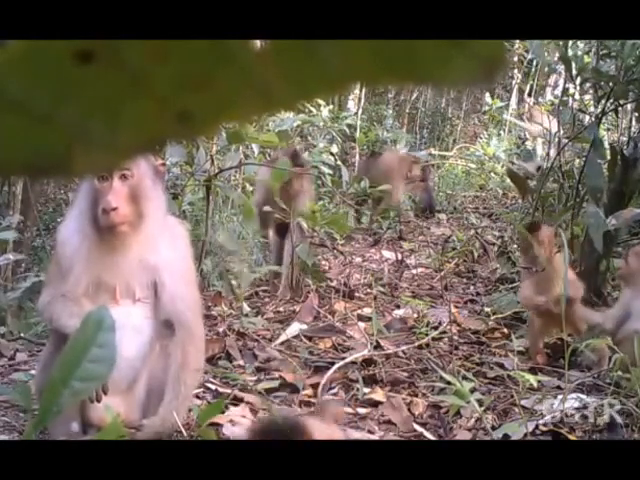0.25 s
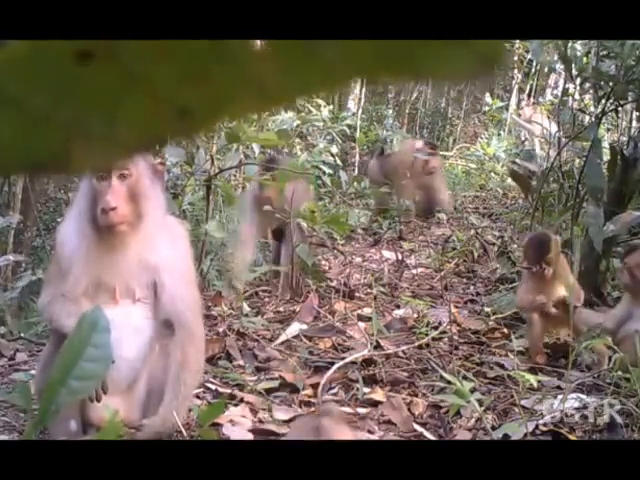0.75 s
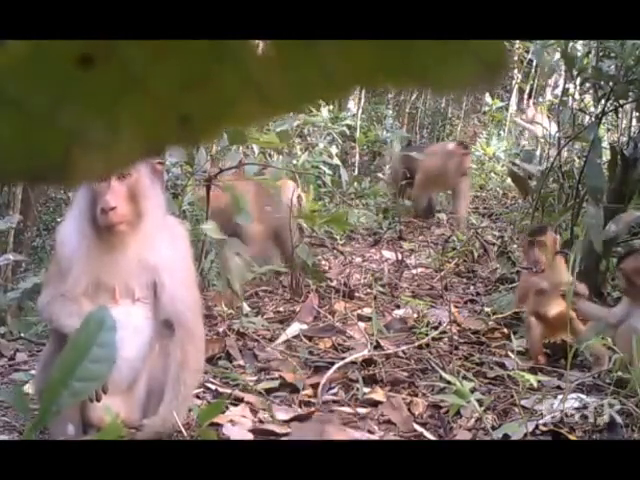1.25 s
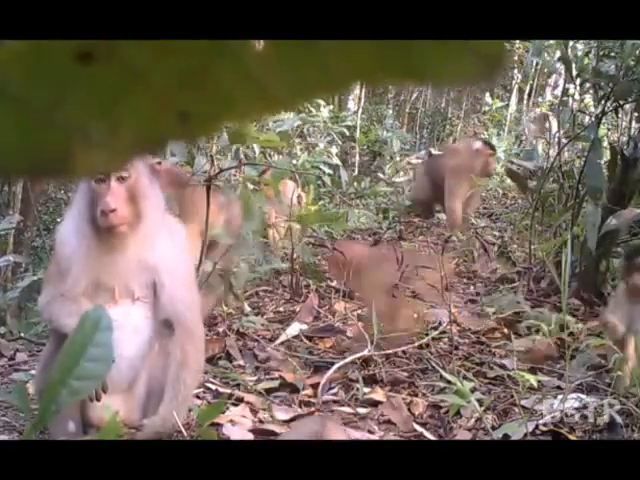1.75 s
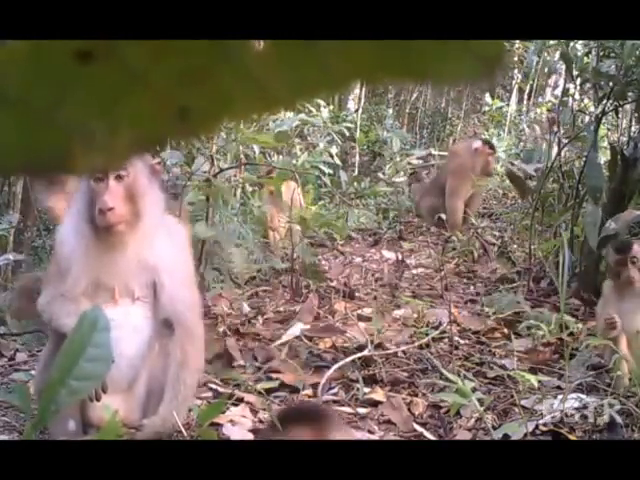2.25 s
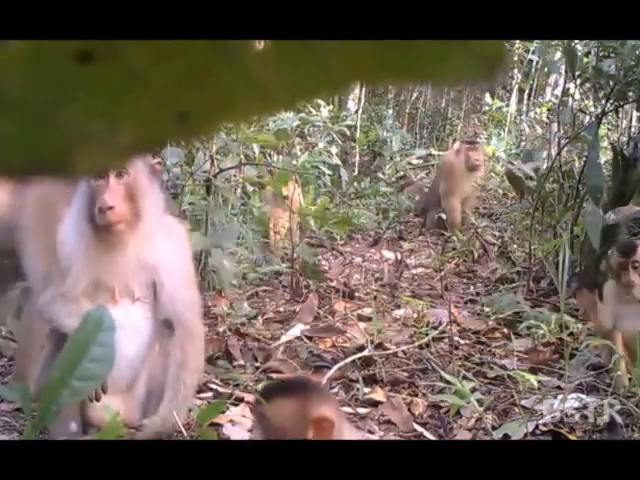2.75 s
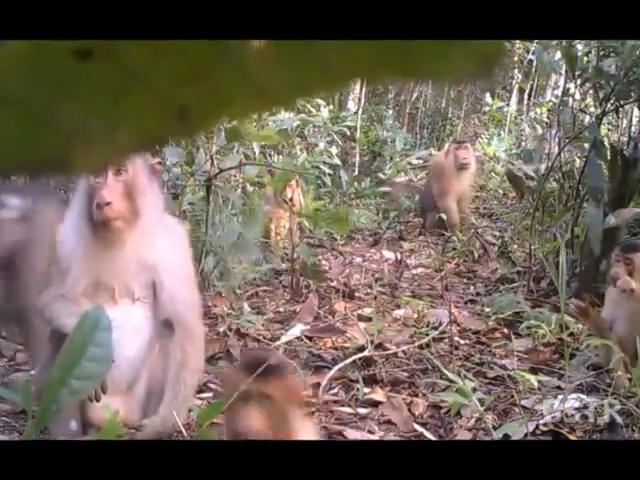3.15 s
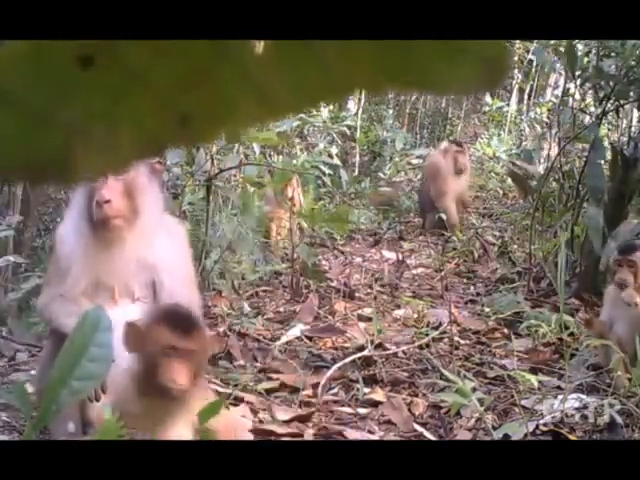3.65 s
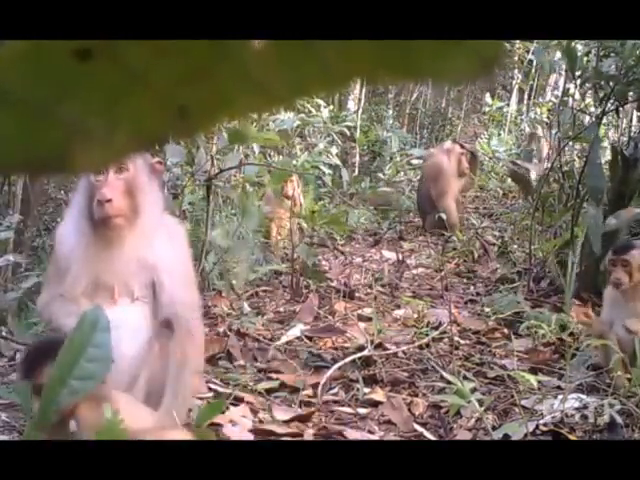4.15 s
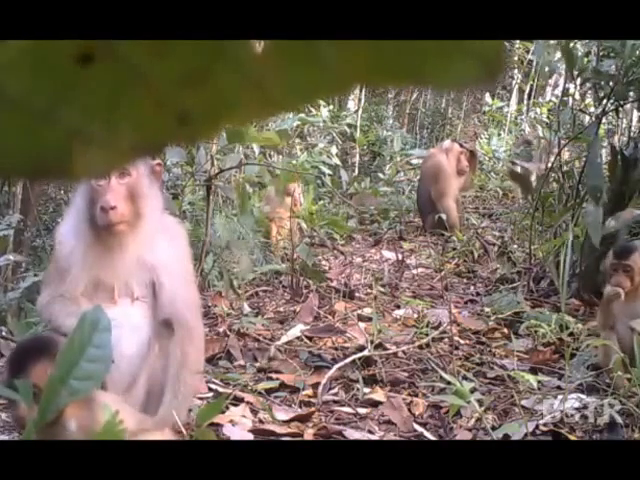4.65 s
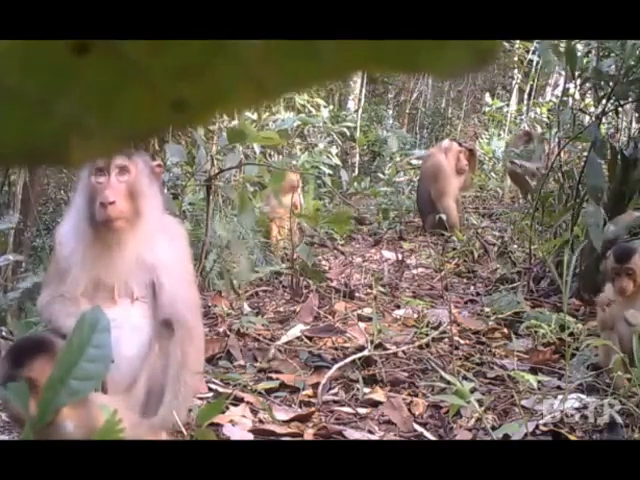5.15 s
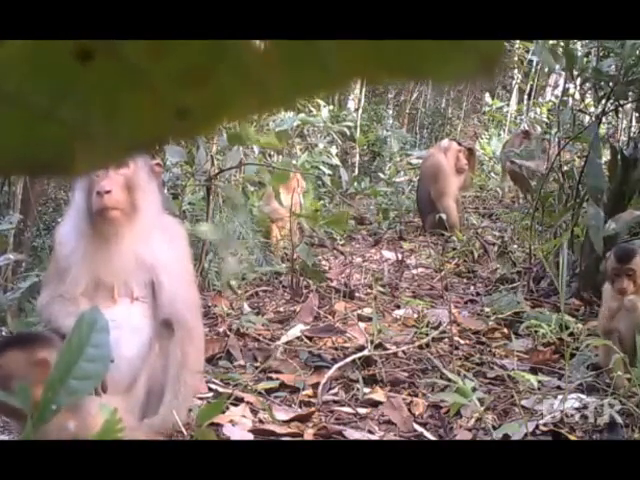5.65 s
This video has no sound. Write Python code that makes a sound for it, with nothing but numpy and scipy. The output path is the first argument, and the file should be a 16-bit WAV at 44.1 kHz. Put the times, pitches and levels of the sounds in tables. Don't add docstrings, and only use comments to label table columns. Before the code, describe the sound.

On a tropical forest floor, a distant bird gives a quick falling whistle about three times a second, echoing off trunks. Insects and air hiss steadily under low wind rumble. Monkeys close to a small boxed microphone stir dry leaves throughout, with a crackling burst and snap near two seconds, more scuffs around three, a sharp twig break at four, and crisp leaf cracks at the end.

```python
import sys
import numpy as np
from scipy import signal
from scipy.fft import rfft, irfft
from scipy.io import wavfile
from scipy.ndimage import uniform_filter1d

SR = 44100
rng = np.random.default_rng(int(sys.argv[2]) if len(sys.argv) > 2 else 0)


def unload_audio(sound):
    columns = np.transpose(np.atleast_2d(sound))
    steps = np.round(np.clip(columns, -1, 1) * 32767)
    wavfile.write(sys.argv[1], SR, steps.astype(np.int16))


def volts_from_decibels(level):
    exponent = np.asarray(level, float) / 20
    return 10 ** exponent


N = 261072


def unit(x):
    return x / np.sqrt(np.mean(x ** 2))


def colour(x, spectrum):
    hz, db = np.transpose(spectrum)
    bins = np.arange(len(x) // 2 + 1) * SR / len(x) + 1e-3
    gain = volts_from_decibels(np.interp(np.log(bins), np.log(hz), db))
    return irfft(rfft(x) * gain, len(x))


def band(x, lo_hz, hi_hz):
    edges = [lo_hz, min(hi_hz, .45 * SR)]
    return signal.sosfilt(signal.butter(2, edges, "band", fs=SR, output="sos"), x)


def curves(table):
    s, *columns = np.transpose(table)
    return [np.interp(np.arange(N) / SR, s, c) for c in columns]


def walk(rate):
    hold = int(SR / rate)
    steps = np.repeat(rng.standard_normal(N // hold + 1), hold)
    return 0.96 * uniform_filter1d(uniform_filter1d(steps, hold), hold)[:N]


def cracks(per_s, spread_db, smear_s, size=N):
    strength_db = spread_db * np.minimum(rng.exponential(size=size), 4.5)
    hits = (rng.random(size) < per_s / SR) * volts_from_decibels(strength_db)
    glow = signal.lfilter([1], [1, -np.exp(-1 / (smear_s * SR))], hits ** 2)
    return unit(np.sqrt(glow + 1e-9) * rng.standard_normal(size))


def add(track, sound, s):
    i = int(s * SR)
    part = sound[max(-i, 0):N - i]
    track[max(i, 0):max(i, 0) + len(part)] += part


def bird():
    # time from its start in seconds, pitch in Hz, level in dB.
    whistle = [
        (.0045, 2660, -26),
        (.006, 2530, -6),
        (.009, 2365, -.5),
        (.0155, 2145, 1.5),
        (.022, 1925, -7),
        (.044, 1360, -14.5),
        (.054, 1303, -12),
        (.08, 1300, -12),
        (.09, 1298, -30),
    ]
    # start in seconds, level in dB, extra strength of the low end in dB.
    song = [(-.012, -29.5, -1), (.4095, -32, 3), (.926, -28, -3), (1.2798, -28, -6), (1.606, -27.5, 0),
            (1.958, -28.5, -4), (2.296, -27.5, 0.5), (2.64, -29, 1), (2.98, -29, 2), (3.3185, -29.5, 3),
            (3.651, -28.5, 0), (4.026, -29, -1), (4.38, -28.5, 1.5), (4.721, -29, -0.5), (5.071, -28, -2),
            (5.552, -28, -0.5), (5.897, -29.5, 0)]
    # delay in seconds, level in dB.
    echoes = [
        (.0028, -11),
        (.0072, -7),
        (.0125, -9.5),
        (.016, -12),
        (.029, -15),
        (.0376, -14),
        (.058, -13),
        (.078, -18),
    ]
    # pitch in Hz, level in dB.
    echo_colour = [
        (1300, -3),
        (1800, 2),
        (2150, -3),
        (2420, 3.5),
        (2700, 6),
    ]
    wood_t60_s, wood_db = .65, -2
    s, hz, db = np.transpose(whistle)
    t = np.arange(int(s[-1] * SR)) / SR
    glide_hz, shape_db = np.interp(t, s, hz), np.interp(t, s, db)
    lag = np.arange(SR // 2) / SR
    fade = volts_from_decibels(-60 * lag / wood_t60_s) * (1 - np.exp(-lag / .006))
    fade *= volts_from_decibels(wood_db) / np.sqrt(np.sum(fade ** 2))
    trunks = rng.standard_normal(len(lag))
    out = np.zeros(N)
    for start, call_db, low_db in song:
        pitch_factor = 1 + .004 * rng.standard_normal()
        wood = fade * (.75 * trunks + .65 * rng.standard_normal(len(lag)))
        for delay, echo_db in echoes:
            wood[int(delay * SR)] += volts_from_decibels(echo_db + 2.0 * rng.standard_normal())
        wood = colour(wood, echo_colour)
        wood[0] += 1
        tone = np.sin(2 * np.pi * pitch_factor * np.cumsum(glide_hz) / SR)
        low_end_db = low_db * np.clip(t / 0.029 - .5, 0, 1)
        call = tone * volts_from_decibels(call_db + shape_db + low_end_db)
        add(out, signal.fftconvolve(call, wood), start)
    return out


def hiss():
    # pitch in Hz, level in dB per Hz.
    hiss_colour = [(35, -4), (60, 2.5), (183, -7), (455, -11.5), (630, -14.5), (1420, -14), (1920, -17.5),
                   (2370, -14.5), (3960, -14.5), (5610, -13), (13000, -23), (14600, -25), (15600, -34)]
    level_db = -37.5 + .5 * walk(3.39)
    return volts_from_decibels(level_db) * unit(colour(rng.standard_normal(N), hiss_colour))


def wind():
    # time in seconds, level in dB.
    gusts = [(0, -26), (.08, -16), (.17, -20), (.3, -15), (.43, -28.5), (.54, -23), (1.08, -25),
             (1.2, -16.5), (1.75, -22), (2.3, -25), (3.59, -24), (3.87, -29), (4.04, -22), (4.8, -27.5),
             (4.92, -16), (5.29, -28.5), (5.43, -16), (5.7, -22)]
    # pitch in Hz, level in dB per Hz.
    rumble_colour = [
        (1.2, -25),
        (2, 1.5),
        (18, 8.5),
        (25, -8.5),
        (38, -11.5),
        (52, -13.5),
        (75, -24),
        (120, -26),
        (200, -76),
    ]
    return volts_from_decibels(curves(gusts)[0] - 4.5) * unit(colour(rng.standard_normal(N), rumble_colour))


def movement():
    # time in seconds, level in dB, extra from big leaves in dB.
    stirring = [(0, -32.5, 0), (.3, -32, 4), (.66, -39, 2), (1.1, -42, 0.5), (1.34, -39, 0.5),
                (1.46, -47, 1), (1.52, -37, -1), (1.78, -39, -1.5), (1.89, -48, 0.5), (2.15, -39, -0.5),
                (2.55, -43.5, 0), (2.73, -37.5, 1), (2.9, -42.5, -2.5), (3.6, -47, 2), (4.2, -38, 1),
                (4.6, -38.5, -1), (5.1, -37.5, 1.5), (5.92, -55, -5)]
    # loudest moment in seconds, level in dB,
    # length in seconds, extra from fine leaves in dB.
    pushes = [(0.127, -36, 0.13, -18), (0.415, -35.5, 0.13, 8), (1.21, -33.5, 0.094, -18),
              (1.823, -30, 0.067, -2), (1.988, -28, 0.098, -6), (2.069, -31, 0.12, -3),
              (2.166, -28.5, 0.018, -9), (2.237, -40, 0.023, 13), (2.465, -34.5, 0.05, -5),
              (2.774, -27.5, 0.021, -22), (2.82, -37.5, 0.034, 26), (2.999, -29.5, 0.037, -10),
              (3.134, -28.5, 0.07, -1), (3.3, -40, 0.062, 3), (3.81, -43, 0.027, 6), (3.96, -25, .015, -19),
              (3.988, -28, 0.088, 3), (4.09, -30, .05, -13), (4.352, -27, 0.027, -8),
              (4.417, -34, 0.24, -13), (4.62, -31, 0.019, -15), (4.662, -34.5, 0.034, 32),
              (4.74, -37, 0.035, 9), (4.934, -33.5, 0.17, -11), (5.12, -36, 0.049, 1),
              (5.503, -31.5, 0.16, -9), (5.738, -36, 0.041, 13), (5.76, -38, 0.02, 13),
              (5.79, -34, 0.027, 12), (5.839, -33, 0.0075, 0)]
    stir_fine_db = -2
    rise_share, fade_db = 0.76, 17.5
    heavy_db, heavy_follow = -3.5, 0.41
    t = np.arange(N) / SR
    stir_db, big_db = curves(stirring)
    power = volts_from_decibels(2 * stir_db)
    fine = power * stir_fine_db
    for s, db, length, fine_db in pushes:
        away = np.maximum(t - s, (s - t) / rise_share) / max(length, .004)
        push = volts_from_decibels(2 * (db - fade_db * away ** 1.5))
        power = power + push
        fine = fine + push * fine_db
    level_db = 10 * np.log10(power)
    big_leaves_db = big_db + heavy_db - heavy_follow * (level_db + 35)
    return level_db, big_leaves_db, fine / power


def shuffle():
    # pitch in Hz, level in dB per Hz.
    litter_colour = [(120, 0), (200, -12), (304, -5), (471, -3), (516, -4.5), (1260, -1.5), (2260, -1),
                     (6050, 0), (11700, -5), (14500, -16), (15600, -26)]
    level_db, heavy_db, fine_db = movement()
    shared = cracks(900, 3.2, .0008)
    scuff_db = 1.1 * walk(25) + 1.3 * walk(70)
    out = np.zeros(N)
    for hz in 250 * 2 ** np.arange(0, 6.1, .5):
        octaves = np.log2(hz / 4500)
        low_lean = np.clip(-octaves / 1.33, 0, 1) * (heavy_db + 8)
        high_lean = np.clip(octaves / 3.1, 0, 1) * (fine_db + 0.5)
        crisp = np.clip(1 + octaves / 5, .1, 1)
        grains = 0.52 * crisp * shared + 0.91 * cracks(1200, 3.9 * crisp, 0.0036 / crisp)
        lean_db = low_lean + high_lean + 1.6 * walk(14)
        out += volts_from_decibels(lean_db) * band(grains, hz / 1.197, hz * 1.228)
    out = colour(out, litter_colour)
    return out / np.std(band(out, 2950, 8250)) * volts_from_decibels(level_db + scuff_db - 3.5)


def crushes():
    # start in seconds, length in seconds, level in dB, pitch of the hollow in Hz.
    squeezes = [(0, 0.65, -41.5, 4470), (1.96, 0.048, -30.5, 1610), (2.9, 0.13, -43, 2880),
                (1.982, .02, -29, 9500), (3.65, 0.046, -40, 3050), (4.336, 0.036, -30.5, 2700),
                (4.345, 0.05, -29.5, 5270), (5.715, .032, -33, 5300), (5.73, .016, -34.5, 9500),
                (5.762, 0.044, -34, 5650), (5.785, .016, -34, 8500)]
    width = 1 + 0.18
    out = np.zeros(N)
    grains = cracks(700, 3.2, .0012, size=2 * SR)
    for k, (s, length, db, hz) in enumerate(squeezes):
        t = np.arange(int(length * SR))
        fractures = grains[k * SR // 10:][:len(t)]
        ring = band(fractures, hz / width, hz * width)
        add(out, volts_from_decibels(db) * unit(ring) * np.sqrt(np.sin(np.pi * t / len(t))), s)
    return out


def leaves():
    # time in seconds, peak in dB, pitch in Hz.
    single = [(2.7704, -18, 3100), (3.2505, -21, 6930), (.3611, -16, 5680), (.438, -18, 5510),
              (.4496, -19, 5990), (4.0313, -20, 7100), (2.0658, -15, 7880), (1.3011, -17.5, 4870),
              (1.4686, -22, 8610), (1.5876, -20.5, 7500), (1.8204, -17, 5860), (2.003, -18, 11110),
              (2.476, -21, 3000), (2.2227, -23, 6030), (2.3395, -19.5, 6500), (2.4162, -19.5, 3790),
              (2.84, -22, 5210), (3.022, -15, 5600), (3.0678, -23, 4660), (3.1222, -17, 8740),
              (3.661, -25, 3140), (3.8643, -22, 8910), (4.0175, -20, 5700), (4.227, -19.5, 10250),
              (4.377, -23, 5470), (4.6231, -23, 5610), (4.8982, -18, 3360), (5.1138, -26, 5900),
              (5.3135, -20, 7800), (5.7378, -20, 9300)]
    count, middle_hz = 120, 5400
    over_db, spread_db = 11.5, 1
    dull_db, bright_db, bright_db_per_octave = -13, -10, 6
    chance = rng.standard_normal((count, 2))
    times = rng.random(count) * (N - 1) / SR
    level_db = movement()[0][(times * SR).astype(int)]
    peak_db = np.minimum(level_db, -30) + over_db + spread_db * chance[:, 0]
    stray = np.c_[times, peak_db, middle_hz * 2 ** (.4 * chance[:, 1])]
    rows = np.r_[single, stray]
    edge_db = rng.standard_normal((len(rows), 2)) * 3
    bright = bright_db + bright_db_per_octave * np.log2(rows[:, 2] / middle_hz) + edge_db[:, 1]
    return np.c_[rows, dull_db + edge_db[:, 0], bright].tolist()


def snaps():
    # time in seconds, peak in dB, pitch in Hz, dull part in dB, bright part in dB.
    loud_snaps = [(0.2135, -19, 3660, -5, -10), (1.5034, -16, 5680, -21, -14), (1.826, -16, 7900, -16, -14),
                  (1.969, -17, 3250, -6, -13), (1.976, -13, 8610, -17, -13), (1.9833, -8, 3130, -17, -23),
                  (1.9916, -15, 10800, -16, -3), (1.9969, -13, 3270, -10, -17), (2.2334, -13.5, 6360, -20, -11),
                  (3.1527, -12.5, 8660, -14, -9), (3.1755, -16.5, 6500, -12, -4), (3.9592, -10, 7100, -27, -20),
                  (3.968, -12, 6900, -22, -15), (3.979, -16, 3100, -19, -19), (3.9981, -18, 5810, 1, -6),
                  (4.3563, -24, 5300, -26, -13), (4.3837, -13, 8740, -25, -11), (4.654, -16, 8500, -22, 3),
                  (5.5646, -14.5, 5340, -3, -17), (5.7314, -16, 6240, -34, -19), (5.768, -17, 5470, -19, -1),
                  (5.788, -21, 5810, -14, -6), (5.794, -18, 7700, -16, -6), (5.839, -16, 6960, -18, -11)]
    t60_s = .018
    out = np.zeros(N)
    t = np.arange(SR // 25) / SR
    for s, db, hz, dull_db, bright_db in [*loud_snaps, *leaves()]:
        first = 2.0 * np.exp(-t / 0.00081) * rng.standard_normal(len(t))
        run = first + cracks(2100, 5.3, 0.00017, size=len(t)) * volts_from_decibels(-60 * t / t60_s)
        body = band(run, hz / 1.15, hz * 1.15) * 1.8 + band(run, 2800, 9000)
        body = body + volts_from_decibels(dull_db + 12) * band(run, 650, 2500)
        body = body + volts_from_decibels(bright_db + 1) * band(run, 9500, 15500)
        add(out, volts_from_decibels(db - 1.5) * body / np.abs(body).max(), s)
    return out


def thuds():
    # time in seconds, peak in dB, pitch in Hz,
    # time to fade by 60 dB in seconds.
    landings = [
        (1.053, -38, 218, 0.063),
        (1.981, -29.5, 220, 0.045),
        (2.126, -26, 250, 0.026),
        (3.144, -39, 250, 0.13),
        (3.186, -28, 270, 0.059),
        (3.956, -30, 240, 0.042),
        (4.742, -27, 318, 0.025),
    ]
    slaps = [
        (1.186, -17, 31.8, 0.086),
        (1.738, -21.5, 32.7, 0.3),
    ]
    knocks = [
        (3.143, -32, 850, 0.033),
        (5.7, -32, 530, 0.045),
        (2.4, -33, 500, 0.045),
        (0.74, -35, 850, .05),
        (4.4, -28, 1550, .03),
        (3.157, -36, 510, .04),
        (2.126, -38, 193, 0.088),
    ]
    out = np.zeros(N)
    t = np.arange(SR // 4) / SR
    for s, db, hz, t60 in [*landings, *slaps, *knocks]:
        fade = volts_from_decibels(db - 60 * t / max(t60, .02))
        soft_start = 1 - np.exp(-t / 0.0016)
        add(out, fade * soft_start * 1.7 * np.sin(2 * np.pi * hz * t), s)
    return out


def twig():
    # time in seconds, peak in dB.
    jerks = [
        (3.9595, -17),
        (3.9632, -22),
        (3.977, -27),
    ]
    # pitch in Hz, level in dB, time to fade by 60 dB in seconds.
    wood_tones = [
        (3050, -2, .04),
        (3420, -3, 0.024),
        (4370, -1, 0.023),
        (5300, -4, .03),
        (6930, -9, .06),
        (7630, -4, .02),
    ]
    out = np.zeros(N)
    t = np.arange(SR // 10) / SR
    for s, db in jerks:
        for k, (hz, tone_db, t60) in enumerate(wood_tones):
            extra_db, detune_percent = rng.standard_normal(size=2)
            fade = volts_from_decibels(db + tone_db + extra_db - 60 * t / t60)
            ring = np.sin(2 * np.pi * hz * (1 + detune_percent / 100) * t)
            add(out, (-1) ** k * fade * ring, s)
    return out


def scene():
    background = bird() + hiss() + wind()
    monkeys = shuffle() + crushes() + snaps() + thuds() + twig()
    return (background + monkeys)[None]


def top_cut(x):
    return signal.sosfilt(signal.butter(12, 15780, fs=SR, output="sos"), x)


def record(dry):
    top_hz, offset = 15700, 0.0027
    cut = signal.sosfilt(signal.ellip(10, .3, 70, top_hz, fs=SR, output="sos"), dry)
    return top_cut(cut + offset)


dry = scene()
out = record(dry)
unload_audio(out)
```